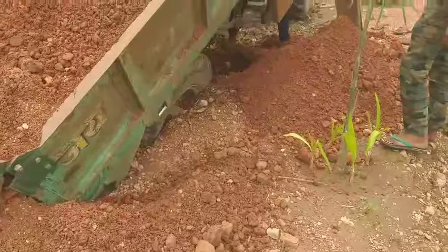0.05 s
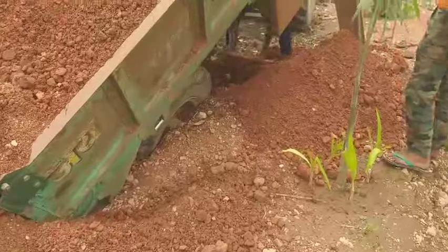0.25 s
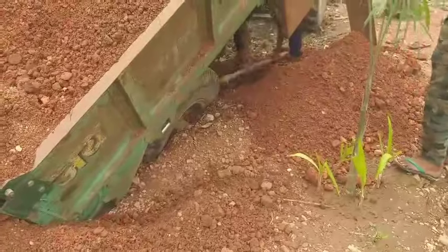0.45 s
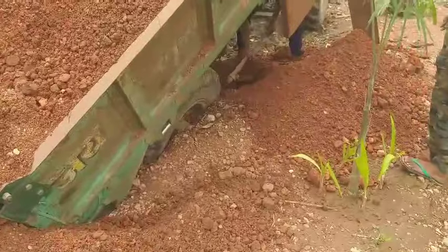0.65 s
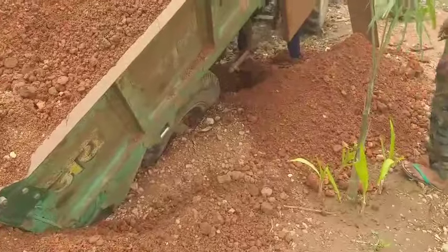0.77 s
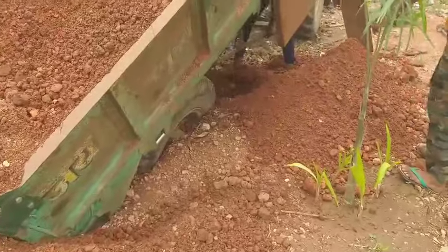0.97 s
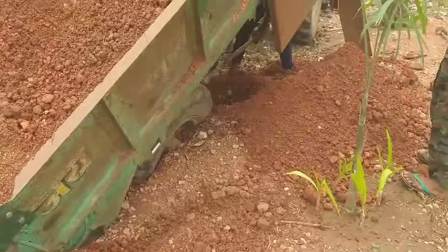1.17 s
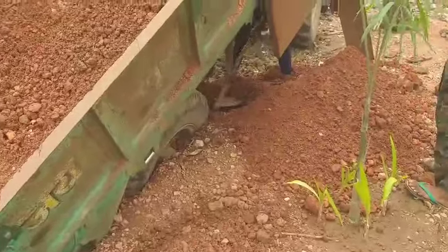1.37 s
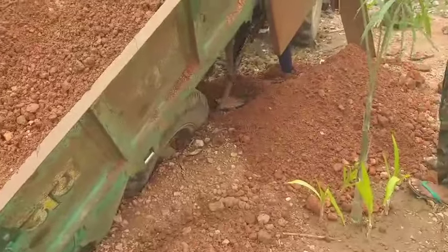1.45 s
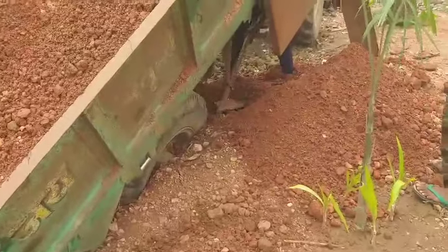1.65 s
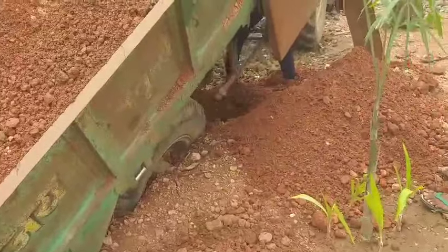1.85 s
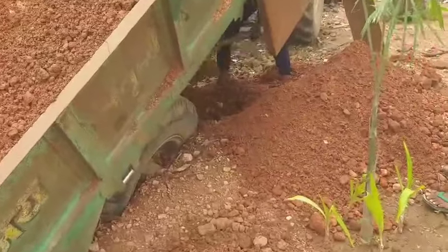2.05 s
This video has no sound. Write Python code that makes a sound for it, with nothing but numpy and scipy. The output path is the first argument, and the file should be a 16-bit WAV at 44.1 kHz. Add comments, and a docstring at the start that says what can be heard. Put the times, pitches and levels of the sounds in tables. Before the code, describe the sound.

Shovel digging in loose gravel: gritty metallic scrape, second strike, then soil sliding over the steel.

```python
"""A steel shovel works a heap of dry, gravelly soil outdoors, in two strokes, heard through one microphone response.
The blade clanks into the gravel and grinds through it; then it strikes again and soil slides over the steel.
Small stones click, clods land with dull knocks, and fine grit trickles all the while over a faint low rumble.
Steel and stone ring as decaying sines with noise bursts; moving soil is clumped random ticks, filtered.
No echo of the place is added; all sources share one direction, leaning a little left in the middle range."""
import sys
import numpy as np
from scipy import signal
from scipy.fft import rfft, irfft
from scipy.io import wavfile
from scipy.ndimage import uniform_filter1d

SR = 44100
rng = np.random.default_rng(int(sys.argv[2]) if len(sys.argv) > 2 else 0)


def generate_wav(signal):
    """Clip the signal to [-1, 1] and save it as 16-bit WAV at the path in sys.argv[1]."""
    frames = np.transpose(np.atleast_2d(signal))
    scaled = np.clip(frames, -1, 1) * 32767
    pcm = np.round(scaled).astype(np.int16)
    wavfile.write(sys.argv[1], SR, pcm)


N = 92610
TIME = np.arange(N) / SR  # s
HIT_TIME = TIME[:8192]  # s, the span of one hit
HZ = np.fft.rfftfreq(4096, 1 / SR) + 1  # filter grid, raised 1 Hz to keep logarithms finite


def amp(db):
    """Decibels to gain."""
    return 10 ** (np.asarray(db) / 20)


def evened(x):
    """Scales to rms 1."""
    return x / np.sqrt(np.mean(x ** 2) + 1e-20)


def unit_hit(x):
    """Scales a hit to the energy of one millisecond at rms 1."""
    return x / np.sqrt(np.sum(x ** 2) * 1000 / SR + 1e-20)


def read(points):
    """A spectrum table on the frequency grid, in dB."""
    hz, db = np.transpose(points)
    return np.interp(np.log(HZ), np.log(hz), db)


def level(points):
    """A level curve as gain per sample."""
    s, db = np.transpose(points)
    return amp(np.interp(TIME, s, db))


def add(mix, s, sound):
    """Mixes a sound in at a time in seconds."""
    part = mix[max(round(s * SR), 0):][:len(sound)]
    part += sound[:len(part)]


def colour(x, db):
    """Causal minimum-phase filter with the given gain per frequency, from the folded cepstrum."""
    cepstrum = irfft(np.log(amp(np.maximum(db, -100))))
    half = len(cepstrum) // 2
    folded = np.r_[cepstrum[0], 2 * cepstrum[1:half], np.zeros(half)]
    impulse_response = irfft(np.exp(rfft(folded)))[:half]
    return signal.fftconvolve(x, impulse_response)[:len(x)]


def low_cut(hz, power):
    """Gain in dB of a low cut that is 3 dB down at its edge."""
    return -10 * np.log10(1 + (hz / HZ) ** power)


def bump(hz, octaves, skirt_db):
    """A broad resonance, at half amplitude this many octaves away, over a skirt, in dB."""
    peak = 1 / (1 + (np.log2(HZ / hz) / octaves) ** 2)
    skirt = amp(skirt_db) * np.minimum(HZ / hz, 1)
    return 20 * np.log10(peak + skirt)


def wander(step_s):
    """A random curve between -2 and 2 with turning points step_s apart on average."""
    knots = np.cumsum(rng.exponential(1, 4000)) * max(step_s, .001)
    return np.interp(TIME, knots, np.clip(rng.standard_normal(len(knots)), -2, 2))


FINE_COUNT_SLOPE = .9  # fine grains outnumber coarse ones by this power of their pitch
FINE_SPREAD = 0.098  # share by which the finest grains vary less in strength than the coarsest
SPURT_DB, SPURT_S = 2.5, .009  # each grain size comes and goes on its own


def grains(per_s, spread_db, clump_db, clump_s, count=12):
    """Clumped ticks of many grain sizes, each with its own pitch and spurts; fine grains are more even."""
    clumps = clump_db * wander(clump_s)
    pitches = np.geomspace(700, 14000, count)
    shapes = [bump(hz, .22, -40) for hz in pitches]
    total_db = 10 * np.log10(sum(amp(shape) ** 2 for shape in shapes))
    shares = pitches ** FINE_COUNT_SLOPE / np.sum(pitches ** FINE_COUNT_SLOPE)
    out = np.zeros(N)
    for shape, share, fineness in zip(shapes, shares, np.linspace(0, 1, count) ** 2):
        uneven = 1 - FINE_SPREAD * fineness
        strength = amp(uneven * spread_db * np.minimum(rng.exponential(1, N), 4))
        size = strength * rng.choice([-1, 1], N)
        ticks = size * (rng.random(N) < per_s * share / SR)
        flow = amp(uneven * (clumps + SPURT_DB * wander(SPURT_S)))
        out += colour(evened(ticks) * flow, shape - total_db)
    return out


def struck(burst, contact_db):
    """Puts one hard first contact at the head of a burst of smaller ones."""
    return unit_hit(burst) + amp(contact_db) * unit_hit(signal.unit_impulse(len(burst)))


# level of the fine grit trickling down the heap [t/s, level/dB]
TRICKLE_LEVEL = [(0, -34), (.07, -34), (.2, -37), (.4, -32), (.7, -37), (.79, -38.5), (.82, -33.5),
                 (.91, -42.5), (.96, -36), (1.05, -38), (1.12, -37), (1.25, -39.5), (1.44, -34),
                 (1.49, -42), (1.8, -37), (2.0, -41.5), (2.1, -47.5)]
# spectrum of that grit [f/Hz, level/dB]
TRICKLE_SPECTRUM = [(300, -29), (1000, -10.5), (2000, -7.5), (3200, -2), (5000, 1.5), (8000, 1), (12000, 0),
                    (15000, -3)]


def trickle():
    """A fine rain of grit down the heap, as dense small ticks."""
    grit = grains(per_s=12000, spread_db=1.5, clump_db=2, clump_s=0.0032)
    return level(TRICKLE_LEVEL) * evened(colour(grit, read(TRICKLE_SPECTRUM)))


# spectrum of the low rumble [f/Hz, level/dB]
RUMBLE_SPECTRUM = [(20, -7.5), (35, -14), (50, -10.5), (80, 2.5), (130, 4.5), (200, -4), (300, -8),
                   (450, -19), (1000, -21), (4000, -43)]
RUMBLE_DB = -53.5


def rumble():
    """A faint, steady low rumble of filtered noise."""
    return amp(RUMBLE_DB) * evened(colour(rng.standard_normal(N), read(RUMBLE_SPECTRUM)))


# soft spills of loose earth [t/s, level/dB, decay/s, f/Hz]
SPILLS = [(0.03, -37.5, 0.061, 795), (.355, -35.5, 0.031, 660), (0.621, -42.5, 0.079, 696),
          (.945, -45, .04, 1000), (1.014, -37.5, 0.025, 660), (1.09, -48, 0.078, 1010),
          (1.208, -30, 0.017, 2120), (1.441, -33.5, 0.013, 1920), (1.525, -45.5, 0.15, 960),
          (1.734, -39.5, 0.22, 2200)]
SPILL_OCTAVES, SPILL_SKIRT_DB = 1, -33


def spills():
    """Loose earth patters down in short, dull runs, each a decaying stretch of one stream of grains."""
    patter = grains(per_s=18000, spread_db=-1.0, clump_db=0.5, clump_s=.005)
    out = np.zeros(N)
    for s, db, decay_s, hz in SPILLS:
        fade = (TIME > s) * np.exp(-abs(TIME - s) / decay_s)
        out += amp(db) * fade * evened(colour(patter, bump(hz, SPILL_OCTAVES, SPILL_SKIRT_DB)))
    return out


# stones knocking together [t/s, level/dB, f/Hz, half-width/octaves, decay/s]
STONES = [(0.1018, -22.5, 4700, 0.43, 0.00033), (0.1565, -26.5, 7750, 0.49, .0005),
          (0.3458, -19, 7300, 0.19, .0007), (0.372, -22, 4100, 0.26, .0009),
          (0.3923, -18, 9000, 0.59, .0008), (0.5283, -20.5, 8000, 0.65, .0005),
          (0.5378, -19, 3700, 0.6, 0.0012), (0.6267, -18.5, 3660, 0.38, 0.00067),
          (.6550, -18.5, 2880, 1, 0.00063), (0.7035, -27, 3020, 0.4, 0.00027),
          (.7095, -23.5, 6950, 0.94, 0.0022), (0.7527, -23.5, 3400, 0.8, 0.001),
          (0.8079, -20, 11800, 0.46, .0008), (0.8959, -22, 4700, 0.48, 0.00079),
          (.9574, -21.5, 7900, 0.54, 0.00054), (0.9856, -17, 4840, 0.49, 0.0008),
          (1.0046, -12.5, 3210, 0.065, 0.0035), (1.0160, -14.5, 2280, 0.64, 0.00045),
          (1.0981, -22, 5100, 0.83, 0.0055), (1.1085, -19.5, 4960, 0.68, 0.00045),
          (1.1946, -24, 11900, 0.67, 0.0031), (1.2082, -20, 10600, 0.38, 0.0012),
          (1.3005, -21.5, 8100, 0.15, 0.0047), (1.381, -20.5, 7000, 0.53, 0.0039),
          (1.419, -21, 6060, 0.28, 0.0026), (1.5048, -24, 5050, 0.15, 0.0022),
          (1.5293, -17, 5000, 0.54, 0.0029), (1.5776, -9.5, 7600, 0.76, 0.0015),
          (1.6269, -19.5, 5900, 1, 0.003), (1.664, -26, 5160, .4, 0.0017),
          (1.6838, -13.5, 6300, 0.27, 0.0021), (1.6955, -16, 5660, 0.89, 0.0033),
          (1.734, -19, 5060, 0.73, 0.006), (1.781, -21.5, 11800, .3, .012),
          (2.0242, -24.5, 4640, 0.6, 0.00058)]
STONE_SKIRT_DB, STONE_CONTACT_DB = -52, -10.5  # first contact against the burst that follows
STONE_TAIL_DB, STONE_TAIL_S = -11.5, 0.0044  # faint scatter after the click
PURE_OCTAVES = 0.24


def stones():
    """Dry noise clicks, each with a faint scatter after it; narrow-band stones also ping."""
    out, t = np.zeros(N), HIT_TIME
    for s, db, hz, octaves, decay_s in STONES:
        fade = np.exp(-t / decay_s) + amp(STONE_TAIL_DB) * np.exp(-t / STONE_TAIL_S)
        burst = rng.standard_normal(len(t)) * fade
        click = unit_hit(colour(struck(burst, STONE_CONTACT_DB), bump(hz, octaves, STONE_SKIRT_DB)))
        ping = unit_hit(np.cos(2 * np.pi * hz * t) * np.exp(-t / decay_s))
        add(out, s, amp(db) * unit_hit(click + (PURE_OCTAVES / octaves) ** 2 * ping))
    return out


# modes of the blade [f/Hz, t60/s, tip-struck level/dB, face-struck level/dB]
BLADE = [(783.4, 0.074, -1, -14.5), (836, 0.1, -16, 0), (1058, 0.071, -28, 7), (1629, 0.038, -5, 4),
         (2657, 0.033, -5, 1.5), (2925, 0.071, -0.5, -3.5), (3570, 0.072, -45, 3.5),
         (3893, 0.064, 2.5, -13), (4160, 0.049, -10.5, 6), (4468, 0.039, 1, 7), (4700, 0.071, 7.5, -20),
         (5000, 0.042, 7, -9), (5300, 0.059, 6, -14), (5450, 0.026, -5, -15), (5530, 0.059, 3.5, -31),
         (5750, 0.066, -24, 5.5), (7400, 0.033, -7, -0.5), (8460, 0.079, -4, -9)]
BODY_WIDTH, BODY_FLOOR_DB = 0.019, -10.5  # half-width as a share of each mode's pitch; valley level


def blade_ring(place):
    """The blade's modes die away as sines, weighted by where it is touched (0 tip, 1 face)."""
    t = HIT_TIME
    ring = np.zeros(len(t))
    for hz, t60, tip, face in BLADE:
        fade = np.exp(-np.log(1000) * t / t60)
        ring += amp(tip + (face - tip) * place) * fade * np.sin(2 * np.pi * (hz * t + rng.random()))
    return unit_hit(ring)


def blade_body(place):
    """The broad resonances through which the blade radiates the crunch, in dB."""
    peaks = 0
    for hz, _, tip, face in BLADE:
        peaks = peaks + amp(tip + (face - tip) * place) ** 2 / (1 + ((HZ / hz - 1) / BODY_WIDTH) ** 2)
    return 10 * np.log10(peaks + amp(BODY_FLOOR_DB) ** 2)


def scrape(grit, spectrum, curve, place, ring_db):
    """Grit rubs along the steel and keeps its modes ringing, ring_db against the rub."""
    rub = evened(colour(grit, read(spectrum)))
    ring = signal.fftconvolve(rub, blade_ring(place))[:N]
    return level(curve) * (rub + amp(ring_db) * evened(ring))


# level of the blade grinding into the heap, before its ring is added [t/s, level/dB]
GRIND_LEVEL = [(.222, -88), (0.236, -24.5), (.26, -31.5), (.31, -27), (.375, -29.5), (.42, -34), (.48, -36),
               (.52, -32.5), (.58, -34.5), (.66, -38.5), (.78, -55)]
# spectrum of the grinding [f/Hz, level/dB]
GRIND_SPECTRUM = [(150, -22.5), (430, -23), (780, -6), (1200, -13.5), (2200, -10.5), (3000, -2.5),
                  (3650, -6), (4200, 1), (5300, -2.5), (8000, -8), (15000, -29)]


def grind():
    """The blade's tip grinds into the heap, rung by the grit it rubs."""
    grit = grains(per_s=9000, spread_db=2.5, clump_db=3.0, clump_s=.004)
    return scrape(grit, GRIND_SPECTRUM, GRIND_LEVEL, place=0, ring_db=-6.0)


# blows of the blade on gravel
# [t/s, level/dB, brightness edge f/Hz, crunch decay/s, ring against crunch/dB, place: 0 tip - 1 face]
BLOWS = [(0.2258, -8, 9000, 0.011, -12, 0.071), (0.2324, -3.5, 7500, 0.0045, -3, 0),
         (.2973, -17.5, 5500, 0.0036, 0, 0.1), (0.3037, -14.5, 6350, 0.0055, -13, 0.23),
         (0.4432, -10, 4600, 0.0022, -14, 0.63), (.4890, -5.5, 4530, 0.0035, -4.5, 0.28),
         (.5065, -11, 4800, 0.0014, -7.5, 0.72), (.9310, -20, 5030, 0.0045, -30, 0.33),
         (.9500, -16.5, 4400, 0.0013, -14, 0.46), (1.0040, -16, 5070, 0.0012, -20, 0.61),
         (1.2069, -17.5, 5970, 0.0021, -35, 0.33), (1.2541, -7, 5100, 0.002, -5, 0.86),
         (1.2575, -8, 6450, 0.0024, -19, 0.95), (1.2613, -8, 6260, 0.005, 0, 0.95),
         (1.275, -15, 5030, 0.0067, -26, 0.76), (1.4418, -15.5, 7450, 0.0047, -29, 0.75),
         (1.6879, -12.5, 7000, 0.0089, -15, 0.5), (1.8115, -18, 5150, .004, -24, 0.75)]
# spectrum of crushed gravel [f/Hz, level/dB]
CRUNCH = [(100, -5), (400, -10), (700, -9), (1300, -7), (2200, -2.5), (3200, -3.5), (4500, -2.5), (6000, 4),
          (9000, 6), (15000, 12)]
BLOW_SLOPE, BLOW_LOW_CUT_HZ = 4.2, 860  # slope: filter order above the brightness edge
CRUNCH_SPREAD_DB, BLOW_CONTACT_DB = 2, -10  # uneven contacts; first contact against the burst
SETTLE_DB, SETTLE_S = -4, 0.011  # second, fixed decay of the crunch


def blows():
    """Each blow crushes a short burst of gravel and rings the soil-damped blade."""
    out, t = np.zeros(N), HIT_TIME
    for s, db, edge_hz, decay_s, ring_db, place in BLOWS:
        strength = amp(CRUNCH_SPREAD_DB * np.minimum(rng.exponential(1, len(t)), 3))
        contacts = rng.standard_normal(len(t)) * strength
        burst = contacts * (np.exp(-t / decay_s) + amp(SETTLE_DB) * np.exp(-t / SETTLE_S))
        dulling = -10 * np.log10(1 + (HZ / edge_hz) ** (2 * BLOW_SLOPE))
        spectrum = read(CRUNCH) + blade_body(place) + dulling
        crunch = unit_hit(colour(struck(burst, BLOW_CONTACT_DB), spectrum))
        add(out, s, amp(db) * (crunch + amp(ring_db) * blade_ring(place)))
    return colour(out, low_cut(BLOW_LOW_CUT_HZ, 4))


# hollow notes of the scoop [t/s, level/dB, starting f/Hz, final f/Hz, decay/s]
THRUMS = [(.2262, -19, 817, 778, 0.01), (.4895, -22, 789, 756, 0.0089), (1.019, -35, 854, 890, 0.021),
          (1.271, -26, 593, 750, 0.016)]
THRUM_ROUGH = .45  # depth of the chatter
GRIP_S = 0.023  # time for the soil to close on the blade


def thrums():
    """The scoop's hollow note slides in pitch as the soil's grip changes, and chatters against the grit."""
    out, t = np.zeros(N), HIT_TIME
    for s, db, start_hz, end_hz, decay_s in THRUMS:
        hz = end_hz + (start_hz - end_hz) * np.exp(-t / GRIP_S)
        note = np.sin(2 * np.pi * np.cumsum(hz) / SR)
        chatter = 1 + THRUM_ROUGH * evened(uniform_filter1d(rng.standard_normal(len(t)), size=130))
        swell = np.minimum(t * start_hz / 2, 1) * np.exp(-t / decay_s)  # builds up over two cycles
        add(out, s, amp(db) * unit_hit(note * swell * chatter))
    return out


# clods landing [t/s, level/dB, f/Hz, decay/s]
CLODS = [(.7030, -14, 713, 0.0011), (1.0048, -20, 900, 0.0022)]
CLOD_KNOCK_HZ, CLOD_KNOCK_DB, CLOD_KNOCK_S = 1830, -6.5, 0.0012
CLOD_LOW_CUT_HZ = 59


def clods():
    """Dull thuds with a decay time of two cycles or less, each with a short knock on top."""
    out, t = np.zeros(N), HIT_TIME
    knock = np.sin(2 * np.pi * CLOD_KNOCK_HZ * t) * np.exp(-t / CLOD_KNOCK_S)
    for s, db, hz, decay_s in CLODS:
        thud = np.sin(2 * np.pi * hz * t) * np.exp(-t / decay_s)
        add(out, s, amp(db) * unit_hit(thud - amp(CLOD_KNOCK_DB) * knock))
    return colour(out, low_cut(CLOD_LOW_CUT_HZ, 2))


# level of the soil sliding over the blade, before its ring is added [t/s, level/dB]
SLIDE_LEVEL = [(1.25, -68), (1.28, -32.5), (1.339, -25.5), (1.40, -35), (1.435, -27), (1.48, -32),
               (1.567, -22), (1.606, -31), (1.68, -31), (1.72, -38), (1.75, -31), (1.83, -33),
               (1.93, -41.5), (2.02, -45), (2.1, -79)]
# spectrum of the sliding soil [f/Hz, level/dB]
SLIDE_SPECTRUM = [(150, -18.5), (450, -27), (700, -18), (1500, -12), (3300, -10.5), (4400, -5), (5600, 3),
                  (6500, -1.5), (8000, -5), (12000, -8.5), (15000, -17)]


def slide():
    """Soil slides over the steel between tip and face, and keeps it ringing."""
    grit = grains(per_s=9000, spread_db=2.0, clump_db=3.0, clump_s=0.0055)
    return scrape(grit, SLIDE_SPECTRUM, SLIDE_LEVEL, place=0.64, ring_db=-10.0)


# modes of the hard pebble [f/Hz, t60/s, level/dB]
PEBBLE = [(5300, 0.029, -5), (5660, 0.0094, 7), (7250, 0.013, 0), (11130, 0.024, -11)]
CHINK_S, CHINK_DB, CHINK_LOW_CUT_HZ = 1.5785, -1, 4400


def chink():
    """One hard pebble springs off the steel and rings briefly, high and bright."""
    out, t = np.zeros(N), HIT_TIME
    ring = np.zeros(len(t))
    for hz, t60, db in PEBBLE:
        ring += amp(db) * np.exp(-np.log(1000) * t / t60) * np.cos(2 * np.pi * hz * t)
    thin = colour(ring, low_cut(CHINK_LOW_CUT_HZ, 4))
    add(out, CHINK_S, amp(CHINK_DB) * unit_hit(thin))
    return out


# lean of the heap's sound to the left [f/Hz, left minus right level/dB]
LEAN = [(20, 0), (700, 0), (1300, 1.6), (1900, 1.1), (2800, 0), (16000, 0)]


def scene():
    """All sources come from one direction, with a slight lean to the left in the middle range."""
    soil = trickle() + spills() + grind() + slide()
    hits = stones() + blows() + thrums() + clods() + chink()
    mono = soil + hits + rumble()
    return np.array([colour(mono, side * read(LEAN) / 2) for side in (1, -1)])


# response of the microphone [f/Hz, level/dB]
MICROPHONE = [(20, -3.5), (3500, -3), (5300, -3), (6250, -11), (7200, -4.5), (8300, 0), (9300, -7.5),
              (10000, -10), (11600, 0), (13000, -1), (15500, -10.5)]
LOW_CUT_HZ, EDGE_HZ = 53, 15650  # low cut and upper band limit
OVERLOAD_DB = -1.5  # ceiling towards which peaks are rounded


def record(dry):
    """The microphone's low cut and rippled treble, soft overload of the peaks, then the band limit."""
    response = read(MICROPHONE) + low_cut(LOW_CUT_HZ, 4)
    heard = np.array([colour(channel, response) for channel in dry])
    heard = heard / (1 + (heard / amp(OVERLOAD_DB)) ** 8) ** (1 / 8)
    band_limit = signal.firwin(511, EDGE_HZ, window=("kaiser", 9), fs=SR)
    return signal.oaconvolve(heard, band_limit[None], "same")


dry = scene()
out = record(dry)
generate_wav(out)
```